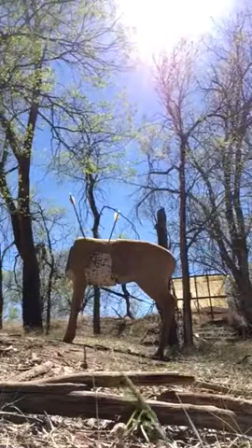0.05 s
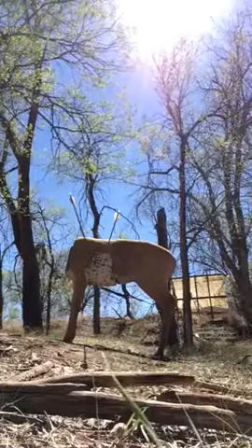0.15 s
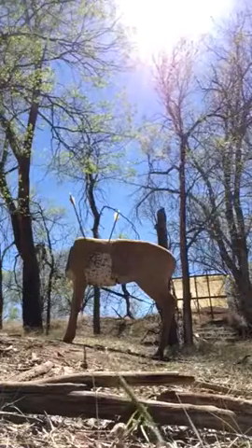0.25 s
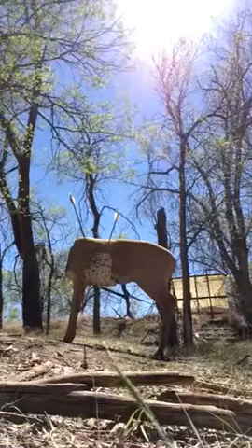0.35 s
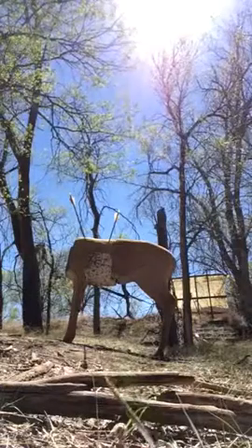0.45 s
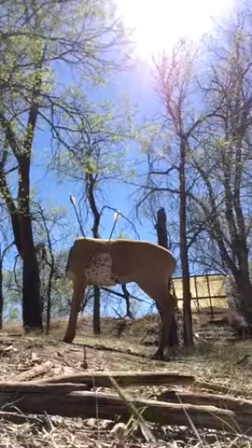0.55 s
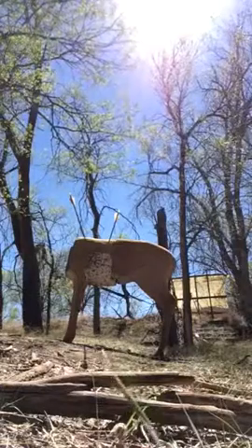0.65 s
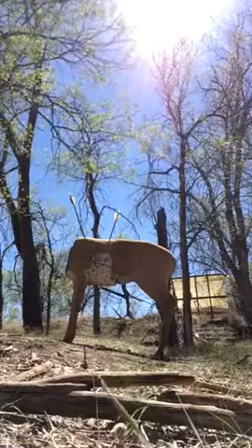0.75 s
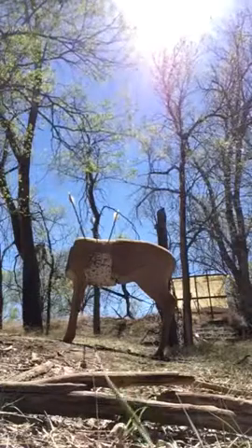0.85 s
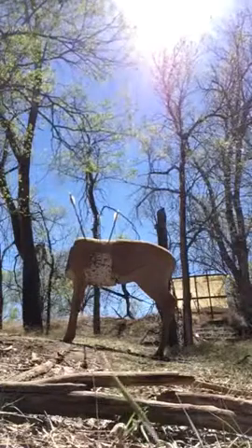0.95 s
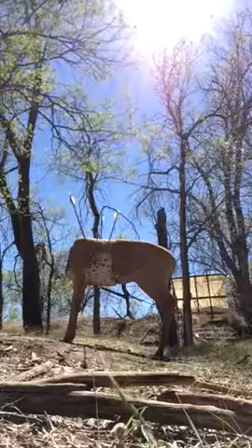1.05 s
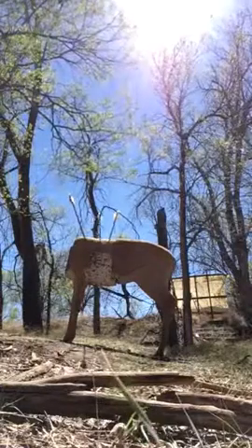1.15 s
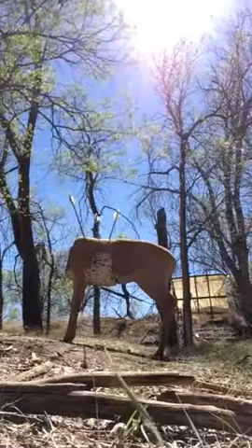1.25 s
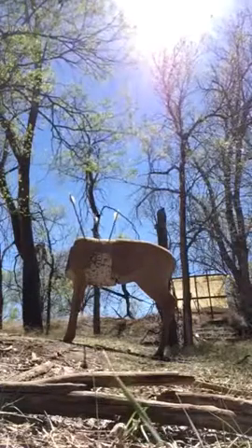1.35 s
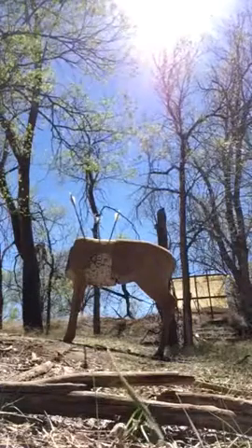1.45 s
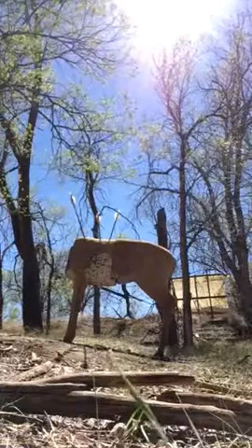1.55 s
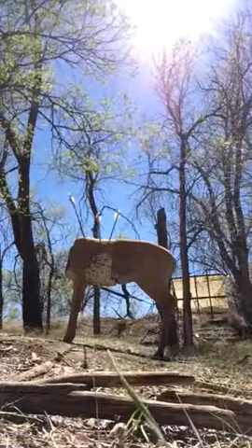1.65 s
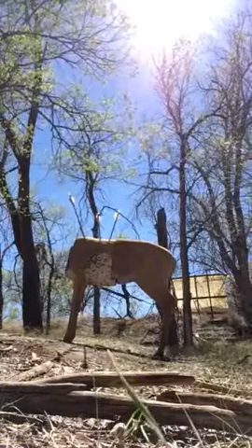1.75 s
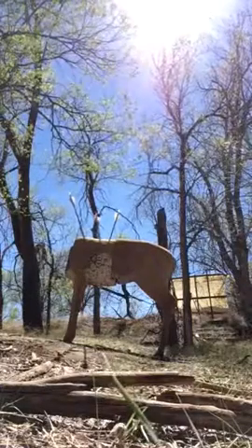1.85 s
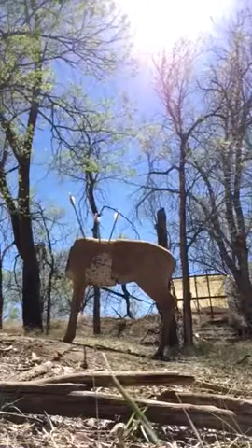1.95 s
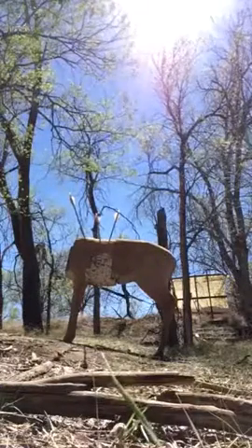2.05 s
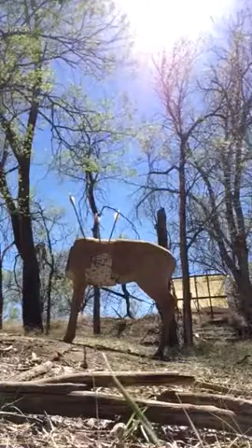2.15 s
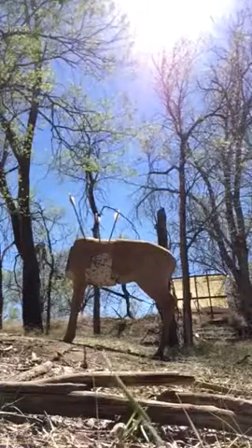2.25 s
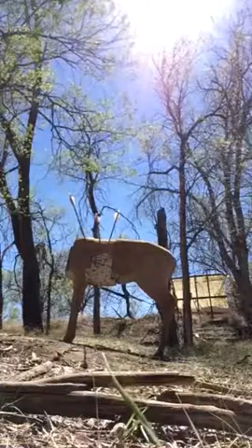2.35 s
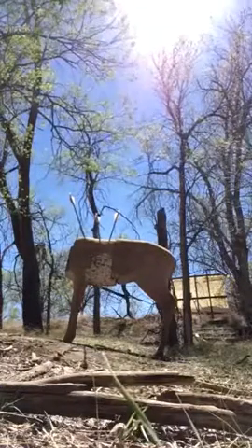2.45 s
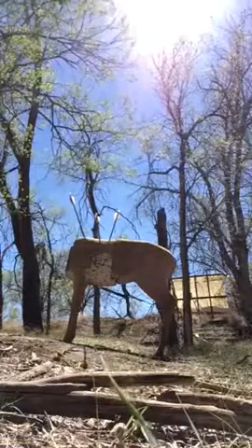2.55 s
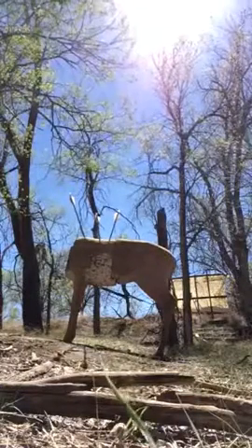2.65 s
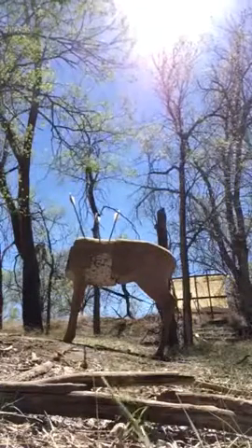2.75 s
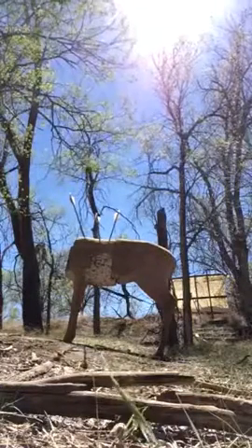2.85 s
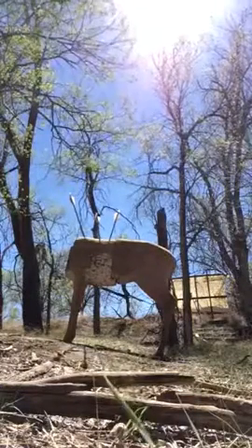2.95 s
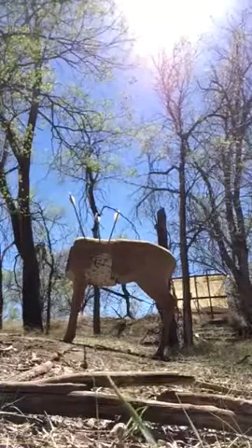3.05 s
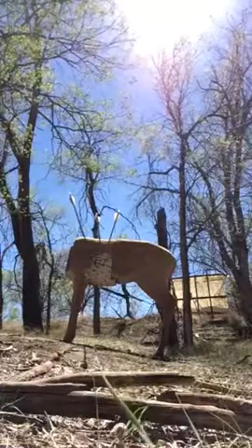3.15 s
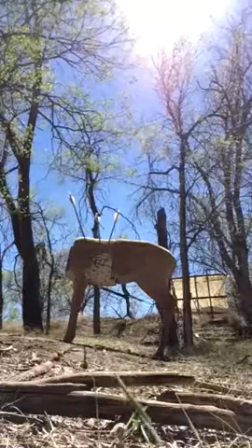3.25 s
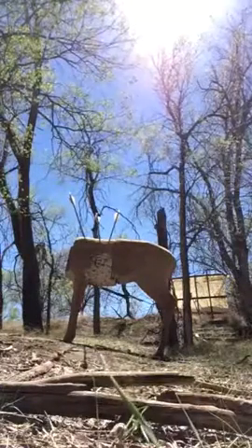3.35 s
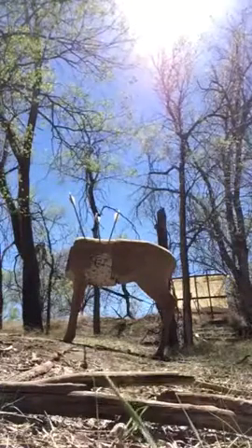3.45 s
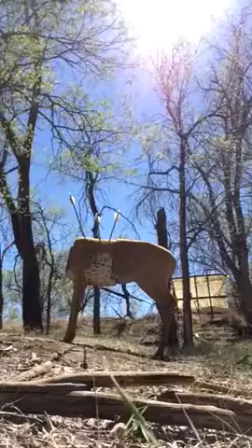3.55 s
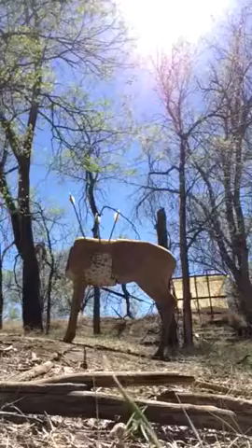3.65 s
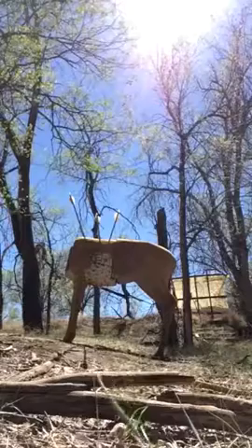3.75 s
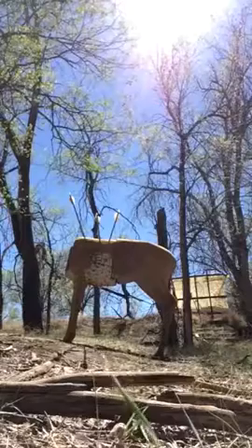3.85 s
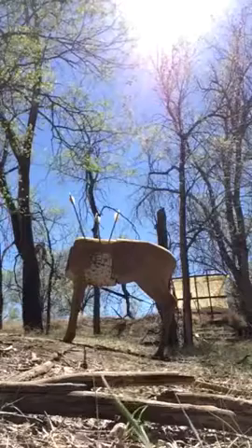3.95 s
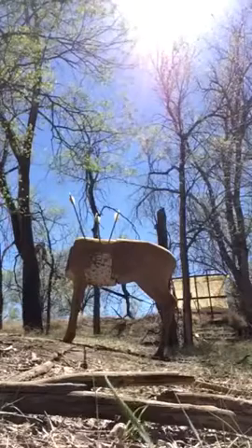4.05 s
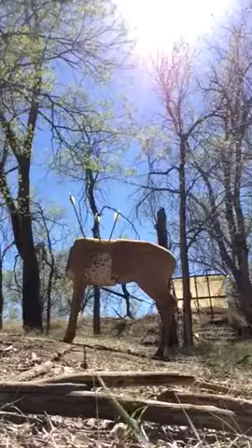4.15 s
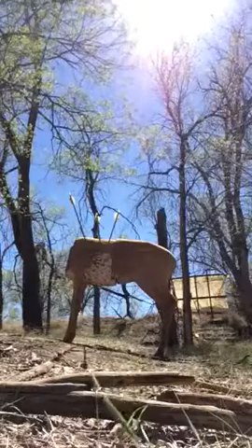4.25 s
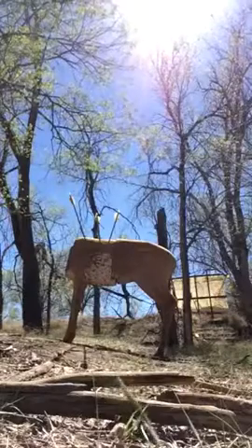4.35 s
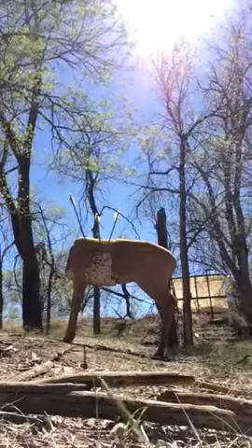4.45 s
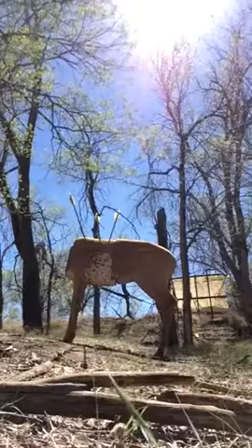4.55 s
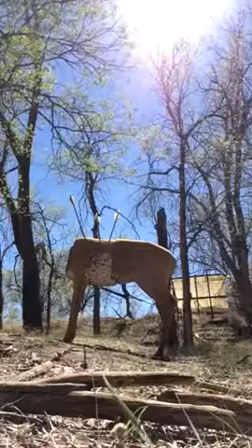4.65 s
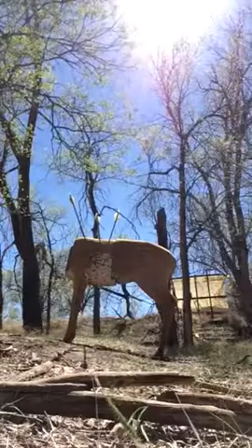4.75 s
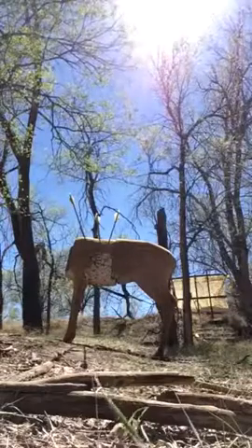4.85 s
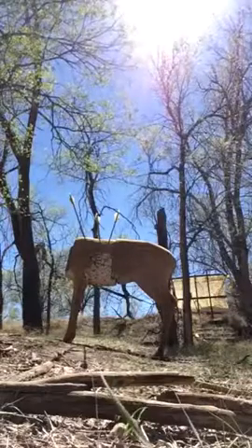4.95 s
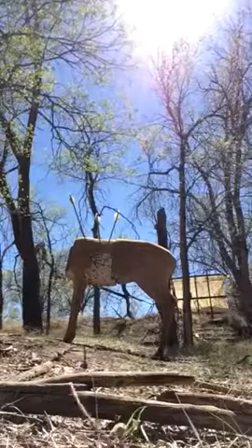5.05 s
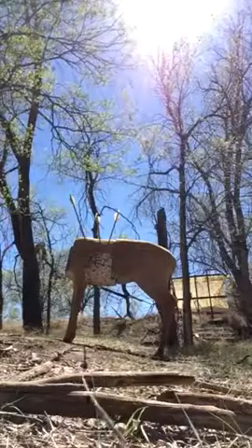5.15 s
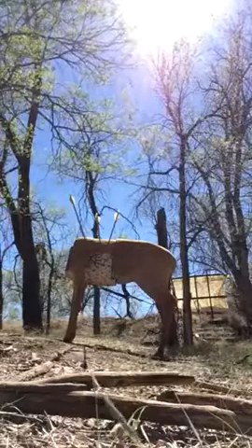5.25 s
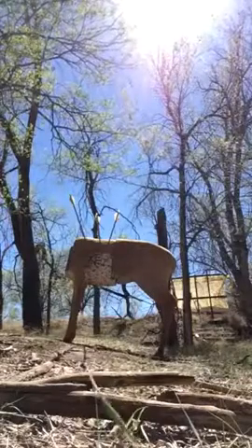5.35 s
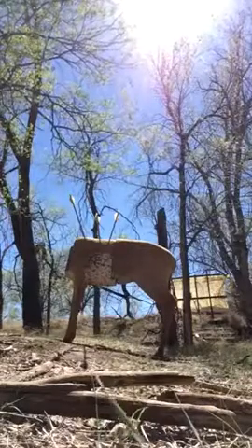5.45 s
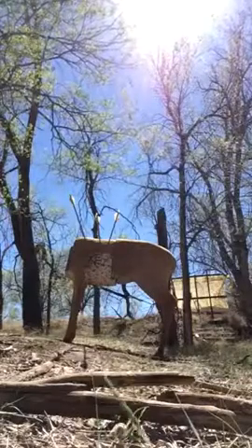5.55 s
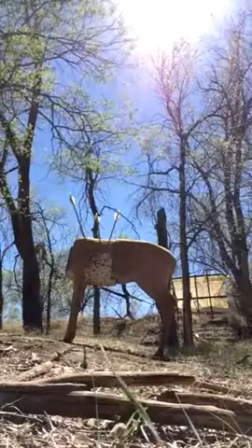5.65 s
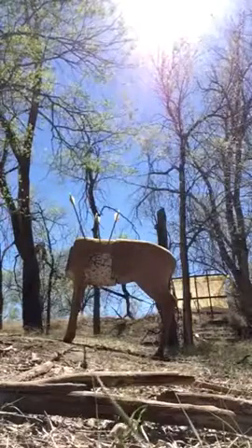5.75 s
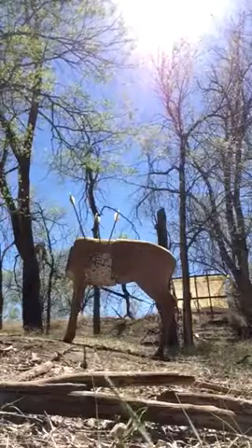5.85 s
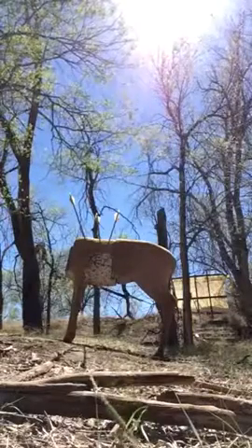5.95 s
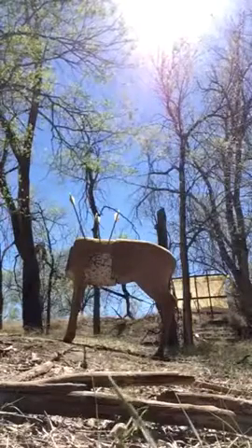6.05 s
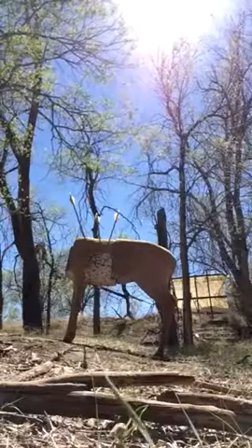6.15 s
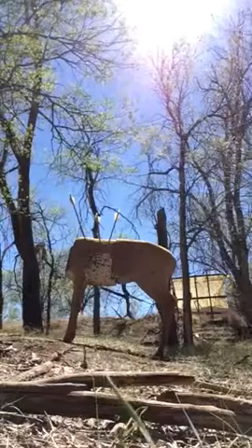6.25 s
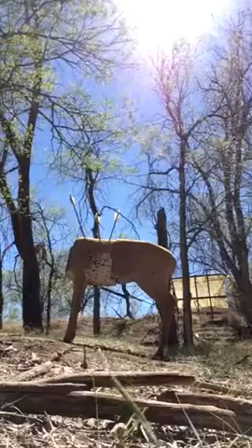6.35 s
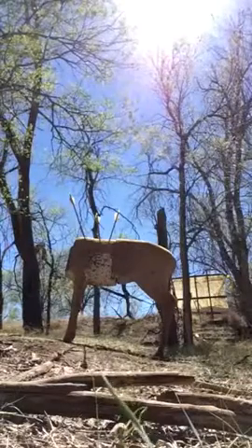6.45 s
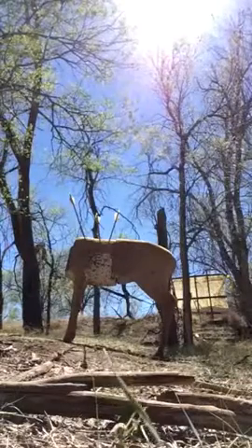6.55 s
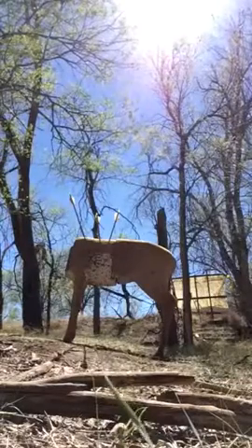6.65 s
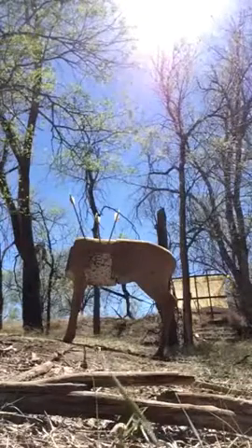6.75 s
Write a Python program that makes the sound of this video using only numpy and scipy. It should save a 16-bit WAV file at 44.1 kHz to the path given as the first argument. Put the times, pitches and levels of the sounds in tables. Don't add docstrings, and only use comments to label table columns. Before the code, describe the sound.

A distant wooden bow thrums, an arrow hisses past and smacks sharply into a foam target, then quiet woodland with faint chirps and wind buffets.

```python
import sys
import numpy as np
from scipy import signal
from scipy.fft import rfft, irfft, next_fast_len
from scipy.io import wavfile
from scipy.ndimage import uniform_filter1d

SR = 44100
rng = np.random.default_rng(int(sys.argv[2]) if len(sys.argv) > 2 else 0)


def ratio_of_db(decibels):
    return 10 ** (np.asarray(decibels, float) / 20)


def waveform_to_disk(signal):
    frames = np.transpose(np.atleast_2d(signal))
    scaled = np.clip(frames, -1, 1) * 32767
    samples = np.round(scaled).astype(np.int16)
    wavfile.write(sys.argv[1], SR, samples)


N = 299181
T = np.arange(N) / SR

# frequency in Hz, level in dB, t60 in seconds.
FOAM_MODES = [(45, -34, 0.072), (100.1, -30, 0.12), (160, -17.5, 0.039), (279, -10, .045),
              (446.5, -12.5, 0.034), (535, -7.5, .02), (620, -8, .075), (866, -12.5, 0.037),
              (987.4, -16, .02), (1434, -29, .04), (1580, -27.5, .04)]
# frequency in Hz, level in dB, t60 in seconds.
SKIN_MODES = [(1500, -10.5, .0046), (1900, -13, .024), (2321, -6.5, .0058), (3259, -11.5, .008),
              (4600, -13, .005), (5618, -20, .0056), (6520, -22, .005), (3920, -22, .012),
              (13000, -28, .004)]
# start in seconds, level in dB, contact in ms, signed push (negative: rebound).
SKIN_BLOWS = [
    (.9123, -24, .3, .72),
    (.9133, 0, .12, .89),
    (.9143, -8.5, .072, -1),
    (.9156, -14.5, .27, .79),
]
# start in seconds, level in dB, contact in ms, signed push.
FOAM_BLOWS = [
    (.9143, 0.5, 0.46, 1),
    (.9175, -5.5, .5, -1),
]
# delay in seconds, level in dB, top frequency in Hz.
TRUNK_ECHOES = [
    (.033, -36.5, 1200),
    (.051, -32, 3020),
    (.064, -32, 1800),
    (.076, -31.5, 1500),
    (.097, -35, 1001),
    (0.113, -46, 1000),
    (0.145, -43.5, 1220),
]
# band centre in Hz, level in dB, t60 in seconds.
WOOD_BANDS = [(110, -46, .3), (230, -40, .4), (450, -39.5, .4), (814, -35, .45), (1300, -37, .4),
              (2200, -44, 0.2), (3595, -54, 0.2), (6500, -61, .12), (11000, -66, .08)]
# frequency in Hz, level in dB, t60 in seconds.
RISER_MODES = [(477, -7, .04), (670, -5, 0.046), (910, -12, .04), (1350, -5, 0.053), (1870, -1, 0.11),
               (2340, -6, 0.037), (2850, -4, 0.027), (3430, -5, 0.051)]
# frequency in Hz, level in dB, t60 in seconds.
LIMB_MODES = [(138, 3, 0.068), (364, -13, 0.046)]
# start in seconds, thrum, ring, knock and rattle levels in dB.
BOW_BLOWS = [
    (0.7078, -51, -69, -41, -69),
    (0.7224, -33, -50, -44, -52),
    (.7262, -44, -48.5, -36.5, -54),
    (0.7423, -47, -62, -48, -53.5),
]
# time in seconds, level in dB, top frequency in Hz.
FLIGHT_PATH = [(.72, -82, 8000), (.73, -57, 8010), (.78, -59, 8000), (.815, -62.5, 8370),
               (.845, -54, 13030), (.87, -54, 16400), (.895, -56, 14680), (.914, -61.5, 11910),
               (.93, -86, 12010)]
# frequency in Hz, density in dB per Hz.
FEATHER_COLOUR = [(150, -1.5), (400, 2.5), (800, -7), (1400, -6), (4000, -9.5), (8000, -9), (15000, -13.5)]
# time in seconds, pitch in Hz, level in dB.
SHAFT_PATH = [(.8, 191.8, -78), (.82, 190.3, -57), (.845, 185, -58), (.87, 176.1, -59.5), (.9, 170, -66.5),
              (.91, 170, -80)]
# multiple of the pitch, level in dB.
SHAFT_TONES = [(1, -0.5), (2, -1.5), (3, -6.5), (7, -12)]
# time in ms, pitch in Hz, level in dB.
LONG_CHIRP = [
    [(-16, 5200, -22), (-2, 5850, -27)],
    [(2, 3050, -13), (14, 5450, -18), (27, 3950, -6), (39, 3250, -9), (45, 4100, -1), (52, 4150, 0),
     (57, 3150, -5), (87, 4050, -3), (101, 3100, -4)],
    [(112, 2700, -9)],
]
# time in ms, pitch in Hz, level in dB.
SHORT_CHIRP = [
    [(-16, 4450, -25), (-12, 4550, -22)],
    [(0, 3400, -14), (5, 3950, -5), (17, 4300, -1), (21, 3550, -4), (28, 3150, -7)],
    [(34, 4300, -15)],
    [(41, 2750, -14), (49, 3450, 1), (53, 2900, -5), (58, 2750, -6)],
    [(65, 2400, -13)],
]
# start in seconds, level in dB, pitch factor, length factor, treble level in dB.
LONG_CALL_ROWS = [
    (1.942, -63, .97, 1.055, 4),
    (4.281, -53.5, 1.0, 1.0, -5),
    (6.7025, -54.5, .99, 1.02, 2),
]
# start in seconds, level in dB, pitch factor, length factor, treble level in dB.
SHORT_CALL_ROWS = [
    (1.084, -63, .98, .99, -6),
    (3.43, -62.5, .98, 1.0, -5),
    (5.407, -55, .99, 1.0, 2.5),
]
# start in seconds, level in dB, band centre in Hz, t60 in seconds.
TWIG_TICKS = [
    (0.539, -76, 11510, .05),
    (1.609, -68.5, 9500, .05),
    (2.097, -73, 10530, 0.031),
    (2.132, -70, 9980, .04),
    (2.149, -71, 10500, 0.049),
    (3.808, -54, 2700, 0.061),
    (3.842, -54.5, 2095, 0.038),
    (5.455, -71, 11000, 0.039),
]
# start in seconds, level in dB, frequency in Hz.
WIND_PUFFS = [(1.643, -53.5, 99.6), (1.8, -55, 125.5), (2.071, -54, 124), (2.403, -57, 54.4),
              (2.7, -49, 86.9), (3.314, -57, 72.7), (3.837, -57, 99.6), (4.111, -39, 86),
              (4.154, -47.5, 53.8), (4.213, -43.5, 67.2), (4.243, -45.5, 97.4), (4.394, -60, 70.2),
              (4.734, -49, 132), (4.818, -49, 104), (4.854, -45, 78.1), (4.878, -44, 110),
              (5.182, -51, 59.1), (5.259, -51.5, 91.5), (5.374, -50, 85.3), (5.409, -48.5, 80),
              (5.503, -51.5, 83), (5.528, -46, 70.0), (5.569, -49.5, 64.6), (5.609, -51, 51.1),
              (5.649, -53, 88.4), (5.698, -51, 62), (5.74, -56, 70)]
# time in seconds, level in dB.
BREEZE_LEVEL = [(0, -67), (.35, -67.5), (.45, -67), (.6, -73.5), (1.2, -63), (1.55, -69), (2.6, -68.5),
                (3.15, -68.5), (3.6, -64), (3.75, -77), (3.87, -62.5), (4.02, -70), (4.48, -66), (4.6, -71),
                (4.98, -68), (5.85, -73), (6.2, -69.5), (6.62, -63.5)]
# time in seconds, level in dB.
FAR_LEVEL = [(0, -65.5), (1.2, -65), (2.0, -66), (2.8, -68), (3.3, -66), (4.0, -69), (4.7, -70), (5.4, -68),
             (6.78, -70)]
# frequency in Hz, density in dB per Hz.
AIR_COLOUR = [(15, -36), (25, -8), (64, 1.5), (113, -2.5), (193, -4.5), (246, -7.5), (331, -8), (567, -14),
              (684, -14), (919, -15), (1140, -18.5), (1490, -20.5), (2490, -31), (7700, -35.5),
              (15500, -45.5)]


def smack():
    out = np.zeros(N)
    for start_s, db, contact_ms, way in SKIN_BLOWS:
        add(out, start_s, -way * ratio_of_db(db) * np.convolve(ring(SKIN_MODES), push(contact_ms)))
        add(out, start_s, ratio_of_db(db - 27) * burst(6500, 2.2, 0.012))
    for start_s, db, contact_ms, way in FOAM_BLOWS:
        add(out, start_s, -way * ratio_of_db(db) * np.convolve(ring(FOAM_MODES), push(contact_ms)))
    add(out, .915, ratio_of_db(-32.5) * burst(3000, 1.8, 0.077))
    add(out, .9015, ratio_of_db(-34.0) * np.hanning(620) * np.sin(2 * np.pi * 95 * T[:620]))
    echoes = np.zeros(N)
    for delay_s, db, top_hz in TRUNK_ECHOES:
        b, a = signal.butter(3, top_hz, fs=SR)
        add(echoes, delay_s, ratio_of_db(db) * signal.lfilter(b, a, out[:2 * SR]))
    add(echoes, .915, ratio_of_db(4.0) * wood())
    return out + echoes


def wood():
    t = T[:SR // 2]
    scatter = np.zeros(len(t))
    for hz, db, t60_s in WOOD_BANDS:
        scatter += ratio_of_db(db + 4.3 * walk(82, count=len(t))) * burst(hz, 1.1, t60_s)
    onset = 1 - np.exp(-t / .006)
    edge_db = -4 * np.clip((t - .105) / 0.019, 0, 1)
    return scatter * onset * ratio_of_db(edge_db)


def bow():
    out = np.zeros(N)
    for start_s, thrum_db, ring_db, knock_db, rattle_db in BOW_BLOWS:
        add(out, start_s, -ratio_of_db(thrum_db) * np.convolve(ring(LIMB_MODES), push(1.0)))
        add(out, start_s, ratio_of_db(ring_db) * ring(RISER_MODES))
        add(out, start_s, ratio_of_db(knock_db) * burst(1030, 2.2, 0.084))
        add(out, start_s, ratio_of_db(rattle_db) * burst(5700, 1.1, .15))
    slap_s = BOW_BLOWS[1][0]
    add(out, slap_s, ratio_of_db(-24.5) * wood())
    return out


def arrow():
    s, db, top_hz = np.transpose(FLIGHT_PATH)
    hiss = coloured(FEATHER_COLOUR)
    dull = signal.sosfiltfilt(signal.butter(4, 8200, fs=SR, output="sos"), hiss)
    near = np.clip(np.interp(T, s, top_hz) / 8000 - 1, 0, 1)
    level_db = np.interp(T, s, db, left=-150, right=-150)
    flutter_db = 2.2 * walk(120)
    return ratio_of_db(level_db + flutter_db) * (dull + near * (hiss - dull))


def shaft():
    s, hz, db = np.transpose(SHAFT_PATH)
    pitch_hz = np.interp(T, s, hz) * (1 + .03 * walk(60))
    phase = 2 * np.pi * np.cumsum(pitch_hz) / SR
    hum = sum(ratio_of_db(tone_db + 2.4 * walk(50)) * np.sin(k * phase) for k, tone_db in SHAFT_TONES)
    return ratio_of_db(np.interp(T, s, db, left=-150, right=-150)) * hum


def bird():
    flick = (6, 548.3, 2.5)
    fade_ms = 1.5
    out, wet = np.zeros(N), np.zeros(N)
    for chirp, calls in ((LONG_CHIRP, LONG_CALL_ROWS), (SHORT_CHIRP, SHORT_CALL_ROWS)):
        for syllable in chirp:
            ms, hz, db = np.transpose(syllable + [np.add(syllable[-1], flick)])
            for call_s, call_db, pitch, length, treble_db in calls:
                t_ms = np.arange(ms[0] - fade_ms, ms[-1] + fade_ms, 1000 / SR / length)
                to_end_ms = np.minimum(t_ms - t_ms[0], t_ms[-1] - t_ms)
                fade = np.clip(to_end_ms / (2 * fade_ms), 0, 1) ** 2
                glide_hz = uniform_filter1d(np.interp(t_ms, ms, hz), size=140) * pitch
                beam_db = treble_db * np.clip((glide_hz - 4300) / 400, 0, 1)
                level = ratio_of_db(call_db + np.interp(t_ms, ms, db) + beam_db)
                note = fade * level * np.sin(2 * np.pi * np.cumsum(glide_hz) / SR)
                start_s = call_s + t_ms[0] * length / 1000
                add(out, start_s, note)
                wet_db = -4 - 0.51 * (call_db + 63.5)
                add(wet, start_s, ratio_of_db(wet_db) * note)
    scatter = ratio_of_db(-28.5) * burst(3200, .8, .4) * (1 - np.exp(-T[:SR // 2] / .012))
    scatter[int(.0095 * SR)] += ratio_of_db(-3)
    return out * ratio_of_db(3.7 * walk(300)) + signal.fftconvolve(wet, scatter)[:N]


def twigs():
    out = np.zeros(N)
    for start_s, db, hz, t60_s in TWIG_TICKS:
        add(out, start_s, ratio_of_db(db + 3) * burst(hz, 0.59, t60_s))
    add(out, 3.8085, ring([(2700, -67, 0.041), (3100, -69, .02), (1900, -68, .03)]))
    return out


def air():
    stir = np.zeros(N)
    for start_s, db, hz in WIND_PUFFS:
        middle_s = start_s + 1.3 / hz
        stir += ratio_of_db(db - 14.5) * np.exp(-((T - middle_s) / 0.034) ** 2)
    breeze = ratio_of_db(np.interp(T, *np.transpose(BREEZE_LEVEL)))
    far_db = np.interp(T, *np.transpose(FAR_LEVEL))
    far_change_db = far_db - far_db.mean()
    late = np.interp(T - 0.092, T, stir)
    duck_db = -1.5 * late / (late + breeze)

    rumble = np.hypot(breeze, stir) * ratio_of_db(-1.0 + 3.0 * walk(21.98)) * coloured(AIR_COLOUR, high_hz=119)
    hum_db = far_db + 0.5 + duck_db + 1.5 * walk(14) + .7 * walk(4.0)
    hum = ratio_of_db(hum_db) * coloured(AIR_COLOUR, 140, 470)
    roar_db = -70 + .3 * far_change_db + 1.0 * walk(7.6)
    roar = ratio_of_db(roar_db) * coloured(AIR_COLOUR, 470, 2600)
    hiss_db = -78.3 + .2 * far_change_db + .6 * walk(12)
    hiss = ratio_of_db(hiss_db) * coloured(AIR_COLOUR, low_hz=2580)
    swell = np.exp(-((T - 5.75) / .4) ** 2)
    vehicle = ratio_of_db(-70) * swell * coloured(AIR_COLOUR, 900 / 1.23, 900 * 1.1)
    flutter = stir * ratio_of_db(-11 + 3.8 * walk(30)) * coloured(AIR_COLOUR, 120, 280)

    out = rumble + hum + roar + hiss + vehicle + flutter
    for start_s, db, hz in WIND_PUFFS:
        cycles = T[:int(2.6 * SR / hz)] * hz
        swing = np.sin(2 * np.pi * (cycles + rng.random()))
        add(out, start_s, ratio_of_db(db - 1.5) * np.hanning(len(cycles)) * swing)
    return out


def ring(modes, seconds=.4):
    t = T[:int(seconds * SR)]
    out = np.zeros(len(t))
    for k, (hz, db, t60_s) in enumerate(modes):
        out += (-1) ** k * ratio_of_db(db) * np.sin(2 * np.pi * hz * t) * 1000 ** (-t / t60_s)
    return out


def push(contact_ms):
    force = np.sin(np.pi * np.clip(T[:128] * 1000 / contact_ms, 0, 1))
    return force / force.sum()


def burst(hz, octaves, t60_s):
    t = T[:SR // 2]
    noise = band(rng.standard_normal(len(t)), hz, octaves)
    return band(noise, hz, octaves) * 1000 ** (-t / t60_s)


def band(x, hz, octaves):
    edges_hz = np.minimum(hz * 2 ** (np.array([-octaves, octaves]) / 2), SR / 2.2)
    return signal.sosfilt(signal.butter(1, edges_hz, "band", fs=SR, output="sos"), x)


def coloured(colour, low_hz=1, high_hz=SR):
    size = next_fast_len(N + N % 2, True)
    hz = np.arange(1, size // 2 + 2) * SR / size
    colour_hz, colour_db = np.transpose(colour)
    shape = ratio_of_db(np.interp(np.log(hz), np.log(colour_hz), colour_db))
    shape = shape / np.sqrt((1 + (low_hz / hz) ** 6) * (1 + (hz / high_hz) ** 6))
    x = irfft(rfft(rng.standard_normal(N), size) * shape, size)[:N]
    return x / x.std()


def walk(rate_hz, count=N):
    k = int(SR / rate_hz)
    steps = np.repeat(rng.standard_normal(count // k + 1), k)
    return uniform_filter1d(uniform_filter1d(steps, k), k)[:count]


def add(track, start_s, sound):
    i = int(start_s * SR)
    track[i:i + len(sound)] += sound[:N - i]


def scene():
    return (smack() + bow() + arrow() + shaft() + bird() + twigs() + air())[None]


def roll_off(x):
    return signal.sosfilt(signal.butter(12, 15870, fs=SR, output="sos"), x)


def record(dry):
    mix = signal.sosfilt(signal.butter(2, 30, "high", fs=SR, output="sos"), dry)
    mix = signal.sosfilt(signal.ellip(8, .2, 60, 15300, fs=SR, output="sos"), mix)
    return roll_off(mix)


dry = scene()
out = record(dry)
waveform_to_disk(out)
```